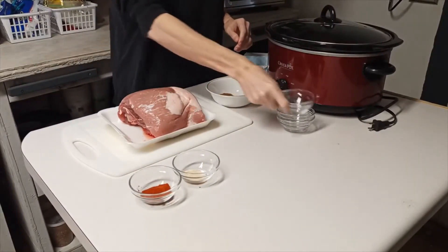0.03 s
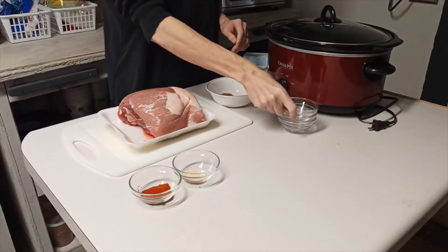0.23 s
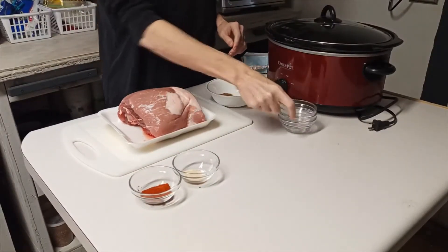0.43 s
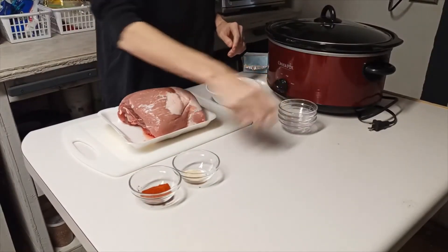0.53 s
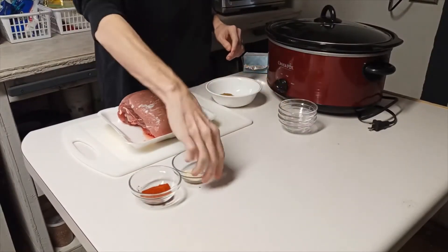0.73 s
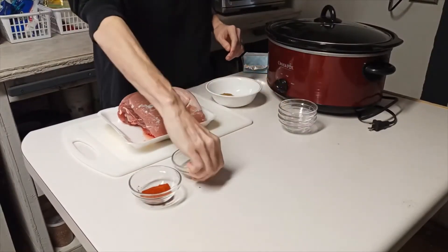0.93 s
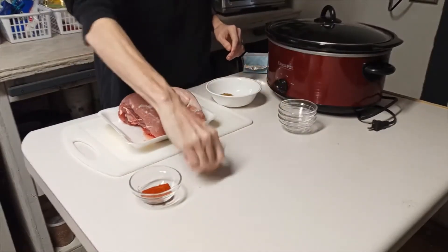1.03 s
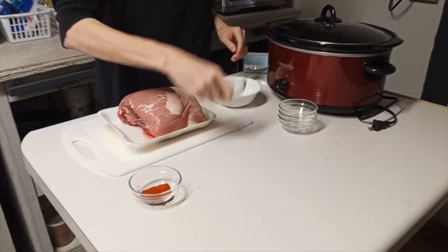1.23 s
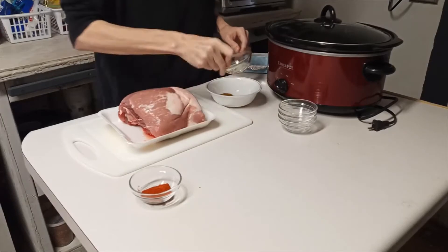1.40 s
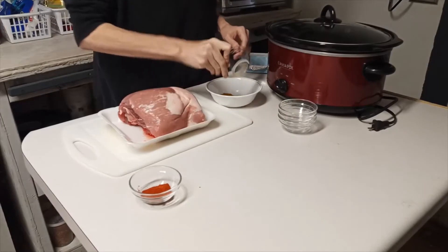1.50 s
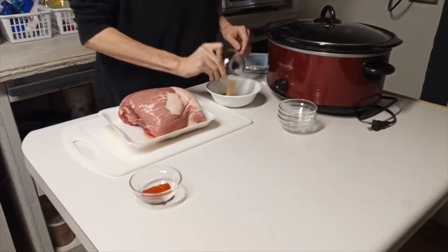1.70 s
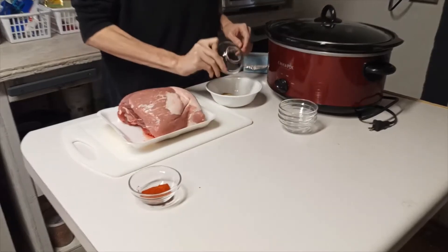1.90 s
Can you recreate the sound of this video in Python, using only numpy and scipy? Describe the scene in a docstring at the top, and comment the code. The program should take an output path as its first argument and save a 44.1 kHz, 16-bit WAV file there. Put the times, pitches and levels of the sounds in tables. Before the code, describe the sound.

Small glass bowl clinks and rattles into a stack, then another bowl scrapes and knocks on a counter

```python
"""A small glass bowl drops into a stack of others on a kitchen counter: it clinks, rattles and settles with a knock.
A second bowl tinks against its neighbour, slides over the counter and knocks on it as it is lifted.
Faint ticks follow as it is tipped over a larger bowl; a quiet hum, still air and one soft tone lie behind.
Contacts are noise bursts plus damped modes, sliding is a stream of random slips, and the small kitchen
answers most of them with a decaying noise tail. All of it reaches a single microphone."""
import sys
import numpy as np
from scipy import signal
from scipy.fft import rfft, irfft, next_fast_len
from scipy.io import wavfile

SR = 44100
rng = np.random.default_rng(int(sys.argv[2]) if len(sys.argv) > 2 else 0)


def store_pcm(level_fs):
    """Save levels as 16-bit WAV."""
    pcm = np.round(np.clip(level_fs, -1, 1) * 32767).astype(np.int16)
    wavfile.write(sys.argv[1], SR, np.atleast_2d(pcm).T)


N = 85995  # length in samples


def amp(db):
    """Decibels to amplitude."""
    return 10 ** (np.asarray(db) / 20)


def unit(x):
    """x scaled to an RMS of one."""
    return x / np.sqrt(np.mean(x ** 2) + 1e-20)


def along(points, hz):
    """Values between (frequency, value) points, on a log frequency axis."""
    point_hz, value = np.transpose(points)
    return np.interp(np.log(hz + 1), np.log(point_hz + 1), value)


def clock(size=SR // 2):
    """Time in seconds for each sample; half a second unless a size is given."""
    return np.arange(size) / SR


def swell(points, outside_db=None):
    """A gain per sample from (time_s, level_db) points."""
    return amp(np.interp(clock(N), *np.transpose(points), left=outside_db, right=outside_db))


def add(track, start_s, sound):
    """Mix a sound into the track at its start time."""
    i = max(0, round(start_s * SR))
    track[i:i + len(sound)] += sound[:N - i]


def coloured(x, colour, tilt_db=0):
    """x through a causal minimum-phase filter with the given spectrum and unit power gain."""
    size = next_fast_len(len(x) + 8192)
    hz = np.fft.rfftfreq(size, 1 / SR)
    gain = unit(amp(along(colour, hz) + tilt_db * np.log2(1 + hz / 1000)))
    # folding the cepstrum onto positive times makes the filter causal
    cepstrum = irfft(np.log(gain + 1e-9), size)
    cepstrum[1:size // 2] *= 2
    cepstrum[size // 2 + 1:] = 0
    response = np.exp(rfft(cepstrum))
    return irfft(rfft(x, size) * response, size)[:len(x)]


def burst(colour, t60, tilt_db=0):
    """The dense, quickly dying part of a contact: coloured noise under a decay."""
    t = clock()
    noise = rng.choice([-1., 1.], len(t))
    return coloured(noise * amp(-60 * t / t60), colour, tilt_db)


def narrow(hz, width, t60):
    """A rough, dying resonance: noise whose colour is 16 dB down at width octaves from its centre."""
    spread = 2 ** abs(width)
    colour = [
        (hz / spread ** 7, -66), (hz / spread, -16), (hz, 0),
        (hz * spread, -16), (hz * spread ** 7, -66)]
    return burst(colour, t60)


TREBLE_LOSS_HZ = 7376  # sets the loss that grows with frequency and shortens the treble


def damped(modes, t60, detune=0):
    """Modes with a shared decay, shorter in the treble; the way the bowls touch shifts pitch slightly."""
    shaped = []
    for hz, db in modes:
        shifted_hz = hz * (1 + detune * rng.standard_normal())
        mode_t60 = 1 / (1 / t60 + (hz / TREBLE_LOSS_HZ) ** 2)
        shaped.append((shifted_hz, db, mode_t60))
    return shaped


MODE_SCATTER_DB = 2
RISE_CYCLES = 1  # a mode builds up over about this many cycles


def ring(modes, tilt_db=0):
    """Damped sine modes at random phases, excited a little differently by each contact."""
    hz, db, t60 = np.transpose(modes)[:, :, None]
    t = clock()
    scatter_db = MODE_SCATTER_DB * rng.standard_normal(hz.shape)
    gain = amp(db + tilt_db * np.log2(hz) + scatter_db)
    rise = 1 - np.exp(-(t * hz / RISE_CYCLES) ** 2)
    waves = np.sin(2 * np.pi * (hz * t + rng.random(hz.shape)))
    modes_sum = np.sum(gain * rise * amp(-60 * t / t60) * waves, axis=0)
    return np.sqrt(2) * modes_sum / np.linalg.norm(gain)


# reverberation of the small kitchen: [pitch_hz, t60_s]
KITCHEN_DECAY = [(100, 0.57), (700, 0.22), (2500, 0.2), (7000, 0.2), (14000, 0.099)]
WALL_DELAY_S = 0.0029  # the answer starts here and is fully in at twice this
# the answer against the direct sound: the less room, the closer a source seems to the microphone
ROOM_DB, STACK_ROOM_DB, RING_ROOM_DB = -1.5, -4.5, -16.5
THUD_ROOM_DB, TINK_ROOM_DB, SCRAPE_ROOM_DB = -6.5, -14, -7.5


def kitchen(x, wet_db):
    """A direct sound plus the room's answer: a noise tail that decays at its own rate in each band."""
    hz, t, bands = signal.stft(rng.standard_normal(SR // 2), SR, nperseg=256)
    decay = amp(-60 * t / along(KITCHEN_DECAY, hz)[:, None])
    tail = signal.istft(bands * decay, SR, nperseg=256)[1]
    tail *= np.clip(clock(len(tail)) / WALL_DELAY_S - 1, 0, 1)
    answer = signal.fftconvolve(x, tail / np.linalg.norm(tail))[:len(x)]
    return x + amp(wet_db) * answer


# partials of the appliance hum: [pitch_hz, relative level_db]
HUM_PARTIALS = [(59.8, 0), (119.6, -2), (150.7, -14), (269.2, -11), (371.4, -16)]
# rise and fall of the hum: [time_s, level_db]
HUM_LEVEL = [(0, -70), (.75, -86), (1.15, -84), (1.4, -73), (1.95, -73.5)]
# swell and fade of a soft tone in the room: [time_s, level_db]
TONE_LEVEL = [(0, -87), (1.17, -88.5), (1.24, -73.5), (1.33, -69), (1.40, -86.5), (1.95, -86.5)]
TONE_HZ = 913
# spectrum of the still air: [pitch_hz, relative level_db]
AIR_COLOUR = [(15, -53.5), (25, -25.5), (44, -6), (117, -6), (335, -6.5), (818, -19.5), (911, -12),
              (1070, -22), (2000, -25), (9570, -34.5), (16000, -51)]
AIR_DB = -75.5


def background():
    """Steady sines make the appliance hum and the soft tone; coloured noise makes the still air."""
    t = clock(N)
    partials = sum(amp(db) * np.sin(2 * np.pi * (hz * t + rng.random())) for hz, db in HUM_PARTIALS)
    hum = swell(HUM_LEVEL) * partials
    tone = swell(TONE_LEVEL) * np.sin(2 * np.pi * TONE_HZ * t)
    air = amp(AIR_DB) * coloured(rng.standard_normal(N), AIR_COLOUR)
    return np.sqrt(2) * (hum + tone) + air


# light touches of fingers and glass: [start_s, level_db, pitch_hz, width_octaves, t60_s]
TICKS = [(1.4616, -66.5, 9520, 0.11, 0.018), (1.704, -67.5, 6270, 0.18, 0.017),
         (1.8292, -79.5, 3406, 0.061, 0.16), (1.85, -79, 2020, 0.12, 0.33)]


def touches():
    """Faint ticks as the bowls are handled, each one narrow resonance with plenty of room."""
    out = np.zeros(N)
    for start_s, db, hz, width, t60 in TICKS:
        add(out, start_s, kitchen(amp(db) * narrow(hz, width, t60), ROOM_DB))
    return out


# the second bowl grazes its neighbour: [start_s, level_db]
TINKS = [(0.8339, -53), (.8465, -61.5)]
# resonances of the second bowl: [pitch_hz, relative level_db, width_octaves, t60_s]
SMALL_BOWL = [(2530, 1, 0.073, 0.13), (4830, -5.5, 0.11, 0.12), (8163, -2, 0.039, 0.062)]
TINK_RISE_S = .002


def tinks():
    """Glass grazing glass: a few rough resonances with a softened onset, close and fairly dry."""
    out = np.zeros(N)
    for start_s, db in TINKS:
        tink = sum(amp(level) * narrow(hz, width, t60) for hz, level, width, t60 in SMALL_BOWL)
        onset = 1 - np.exp(-clock() / TINK_RISE_S)
        add(out, start_s, kitchen(amp(db) * tink * onset, TINK_ROOM_DB))
    return out


# friction over the counter, silent outside these times: [time_s, level_db]
FRICTION_LEVEL = [(.845, -73.5), (.865, -58), (.89, -54.5), (.935, -52.5), (.953, -48), (.961, -44),
                  (.974, -50), (.995, -60.5), (1.045, -71), (1.069, -64.5)]
# spectrum of the scraping: [pitch_hz, relative level_db]
SCRAPE_COLOUR = [(300, -40.5), (480, -9.5), (620, 10), (1000, 2.5), (1400, -5), (1800, 1), (2500, -16),
                 (3100, -25), (4300, -26.5), (12000, -66.5)]
# modes that the sliding keeps ringing: [pitch_hz, relative level_db, t60_s]
SLIDE_MODES = [(646, -6, .08), (704, 0, .12), (775, -7, .06), (830, -11, .05)]
SLIPS_PER_S = 1500
SLIDE_RING_DB = 3  # ringing against scraping


def slide():
    """Friction as tiny random slips, heard as a scrape and through the modes they keep ringing."""
    slips = rng.choice([-1., 1.], N) * (rng.random(N) < SLIPS_PER_S / SR)
    scrape = unit(coloured(slips, SCRAPE_COLOUR))
    sing = amp(SLIDE_RING_DB) * unit(signal.fftconvolve(slips, ring(SLIDE_MODES))[:N])
    friction = swell(FRICTION_LEVEL, outside_db=-np.inf)
    return kitchen(friction * scrape, SCRAPE_ROOM_DB) + kitchen(friction * sing, RING_ROOM_DB)


# spectrum of the foot's knock: [pitch_hz, relative level_db]
FOOT_COLOUR = [(60, -43.5), (200, -12.5), (330, -3.5), (550, 7), (850, 5.5), (1200, -2), (1900, 1.5),
               (2900, -13), (3800, -22.5), (4700, -40.5), (5600, -30.5), (7000, -53.5), (12000, -71.5)]
# modes that the knock rings: [pitch_hz, relative level_db]
FOOT_MODES = [(435, -8), (531, -1), (690, 2), (813, -1), (864, 0), (1045, -3), (1436, -6), (1879, -6)]
# the short bright crack of the foot: [pitch_hz, relative level_db, t60_s]
CRACK_MODES = [(1790, -2, .035), (1950, 0, .035), (2300, -6, .018), (2900, -8, .012)]
KNOCK_S, KNOCK_DB, CRACK_DB = 1.0676, -30.5, -27.5
FOOT_T60_S = .028
FOOT_RING_T60_S, FOOT_RING_DB = .175, -4  # decay before treble loss; level against the knock


def foot_knock():
    """The foot hits the counter as the bowl is lifted: noise burst, ringing modes and a dry crack."""
    out = np.zeros(N)
    knock = kitchen(burst(FOOT_COLOUR, FOOT_T60_S), ROOM_DB)
    body = kitchen(ring(damped(FOOT_MODES, FOOT_RING_T60_S)), RING_ROOM_DB)
    crack = amp(CRACK_DB) * ring(CRACK_MODES)
    add(out, KNOCK_S, amp(KNOCK_DB) * (knock + amp(FOOT_RING_DB) * body) + crack)
    return out


# the rims rattle between contacts: [start_s, end_s where the fade begins, level_db]
RATTLES = [(.24, 0.28, -38), (0.38, 0.4, -38.5), (0.411, .455, -41)]
# spectrum of glass hitting glass, also played by the stack: [pitch_hz, relative level_db]
CLACK_COLOUR = [(300, -23.5), (900, 2.5), (2000, 1.5), (3600, 0), (4500, -0.5), (6900, 0), (7700, -1),
                (9300, -1), (10600, -18), (11700, -6), (14300, -26.5), (15600, -25)]
# modes of the dropped bowl, also played by the stack: [pitch_hz, relative level_db]
DROPPED_MODES = [(1311, -9), (1889, -15), (3010, -6), (4685, -7), (7174, -9), (7315, -4), (7375, -4),
                 (7495, 1), (7635, -3), (7754, -1), (7810, -4), (7946, -8), (8574, -7), (11650, -16)]
CHATTER_PER_S, CHATTER_T60_S = 450, 0.09
CHATTER_BRIGHT_DB, CHATTER_RING_DB = 1.5, -4  # treble tilt of the clack; bowl energy against clack
CLACK_T60_S = .028
DROPPED_T60_S = .16  # before treble loss
DETUNE = 0.00092  # relative pitch scatter of the modes


def chatter():
    """Many tiny random rim contacts keep the dropped bowl ringing, a little differently in each rattle."""
    t, out = clock(N), np.zeros(N)
    for start_s, end_s, db in RATTLES:
        level = (t >= start_s) * amp(db - 60 * np.maximum(t - end_s, 0) / CHATTER_T60_S)
        contacts = rng.choice([-1., 1.], N) * (rng.random(N) < CHATTER_PER_S / SR)
        hits = level * unit(contacts)
        clack = burst(CLACK_COLOUR, CLACK_T60_S, CHATTER_BRIGHT_DB)
        bowl = ring(damped(DROPPED_MODES, DROPPED_T60_S, DETUNE))
        answer = clack / np.linalg.norm(clack) + amp(CHATTER_RING_DB) * bowl / np.linalg.norm(bowl)
        out += kitchen(signal.fftconvolve(hits, answer)[:N], STACK_ROOM_DB)
    return out


# the stack rocks on the counter with ever lower thumps: [start_s, level_db, pitch_hz]
ROCKS = [(0.418, -44, 175.3), (0.454, -46, 158), (0.476, -48.5, 118), (0.492, -56, 89)]
ROCK_T60_S = 0.14


def rocking():
    """Each rock of the stack is one low damped mode, without room."""
    out = np.zeros(N)
    for start_s, db, hz in ROCKS:
        add(out, start_s, amp(db) * ring([(hz, 0, ROCK_T60_S)]))
    return out


# contacts in the stack, levels before the trims below: [start_s, clack level_db, dropped bowl level_db,
# stacked bowls level_db, counter thump level_db, brightness_db_per_octave]
CLINKS = [(0.2362, -29.5, -22, -28.5, -34.5, 1.5), (0.2426, -35.5, -24.5, -38.5, -30, 0),
          (0.2665, -35.5, -23, -38.5, -39.5, 6), (.2935, -34, -38, -33.5, -28.5, -4),
          (.3005, -37, -34.5, -39, -28.5, -5.5), (.347, -50.5, -48.5, -51.5, -39.5, 2),
          (0.3824, -28.5, -31, -23.5, -32, 5), (0.4123, -25, -33, -30.5, -26, 0),
          (0.4316, -37.5, -46.5, -36.5, -31, -8.5), (0.4389, -38, -39, -29, -26.5, 0),
          (.4615, -31.5, -38.5, -33, -29.5, 2), (0.5558, -35.5, -56, -52, -37, 2),
          (0.5597, -33.5, -63, -49, -29, -3)]
# modes of the stacked bowls: [pitch_hz, relative level_db]
STACKED_MODES = [(1432, -4), (1860, -3), (2725, -4), (4177, -4), (4290, 2), (4345, -4), (4828, -7),
                 (5659, -8), (5725, -3), (6670, -5), (7597, 0), (7660, -1), (7763, -1), (8420, -8),
                 (11563, -15), (12310, -19)]
# spectrum of the thud: [pitch_hz, relative level_db]
THUD_COLOUR = [(40, -38.5), (110, -27), (250, 0.5), (420, 3.5), (750, 11.5), (1200, -6), (2000, -16.5),
               (4000, -60)]
# modes of the counter under the stack: [pitch_hz, relative level_db, t60_s]
COUNTER_MODES = [(237, 4, .16), (438, -8, .09), (637, -3, .15), (702, -3, .14), (772, -3, .13),
                 (870, -6, .11), (960, -5, .11)]
# the whole stack ringing on once the bowl is seated: [pitch_hz, relative level_db]
SEATED_MODES = [(1857, 2), (2756, -6), (4345, -4), (4522, -1), (5324, -2), (5496, -4), (7698, 1),
                (8371, -7), (12310, -10)]
STACKED_T60_S, SEATED_T60_S = 0.19, .19  # before treble loss
THUD_T60_S, SEATED_DB = .022, -38
DROPPED_TRIM_DB, STACKED_TRIM_DB, THUD_TRIM_DB, COUNTER_TRIM_DB = -8.5, -10, -2, -5.5


def stack():
    """Each contact clacks, rings the bowls and thumps the counter beneath; the last leaves a seated ring."""
    out = np.zeros(N)
    for start_s, clack_db, dropped_db, stacked_db, thump_db, bright_db in CLINKS:
        clack = amp(clack_db) * burst(CLACK_COLOUR, CLACK_T60_S, bright_db)
        dropped_modes = damped(DROPPED_MODES, DROPPED_T60_S, DETUNE)
        upper = amp(dropped_db + DROPPED_TRIM_DB) * ring(dropped_modes, bright_db)
        stacked_modes = damped(STACKED_MODES, STACKED_T60_S, DETUNE)
        lower = amp(stacked_db + STACKED_TRIM_DB) * ring(stacked_modes, bright_db)
        thud = amp(thump_db + THUD_TRIM_DB) * burst(THUD_COLOUR, THUD_T60_S)
        counter = amp(thump_db + COUNTER_TRIM_DB) * ring(COUNTER_MODES)
        add(out, start_s, kitchen(clack, STACK_ROOM_DB))
        add(out, start_s, kitchen(thud, THUD_ROOM_DB))
        add(out, start_s, kitchen(upper + lower + counter, RING_ROOM_DB))
    last_contact_s = CLINKS[-1][0]
    add(out, last_contact_s, amp(SEATED_DB) * ring(damped(SEATED_MODES, SEATED_T60_S)))
    return out


def scene():
    """All sources summed at one microphone, as a single channel."""
    second_bowl = tinks() + slide() + foot_knock()
    first_bowl = chatter() + rocking() + stack()
    return (background() + touches() + second_bowl + first_bowl)[None]


TOP_HZ = 16300


def record(dry):
    """The recorder's band limit: a steep low-pass removes nearly everything above it."""
    low_pass = signal.cheby1(14, .1, TOP_HZ, fs=SR, output="sos")
    return signal.sosfilt(low_pass, dry)


dry = scene()
out = record(dry)
store_pcm(out)
```